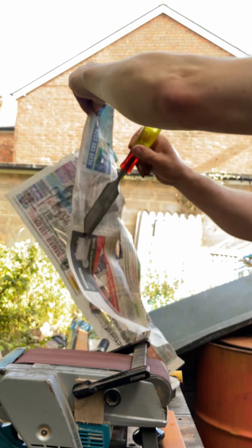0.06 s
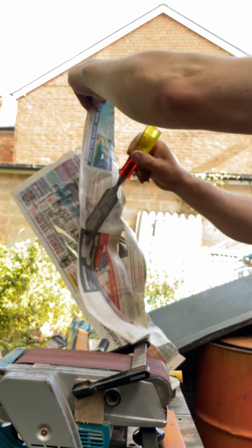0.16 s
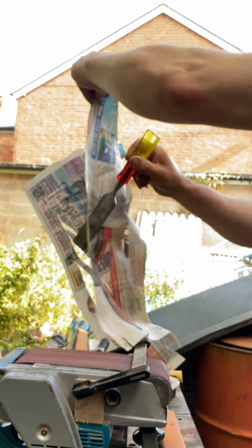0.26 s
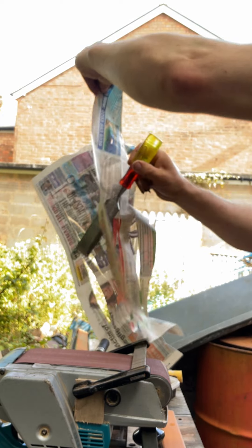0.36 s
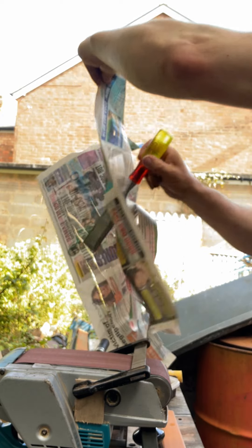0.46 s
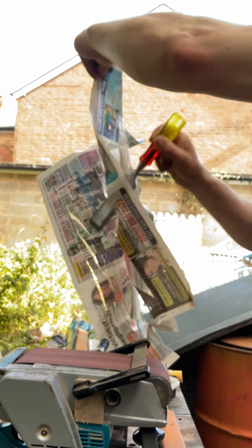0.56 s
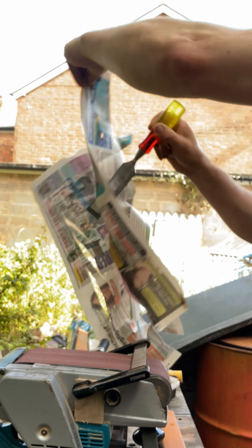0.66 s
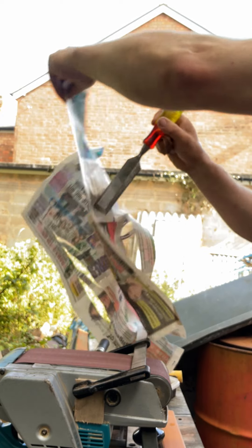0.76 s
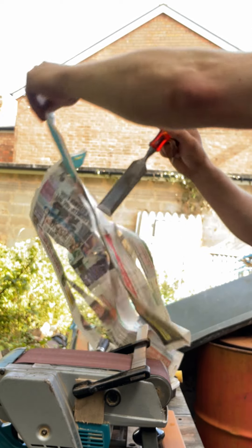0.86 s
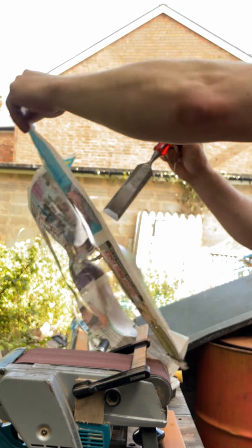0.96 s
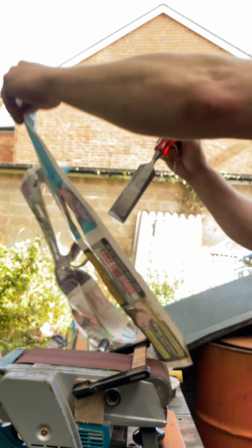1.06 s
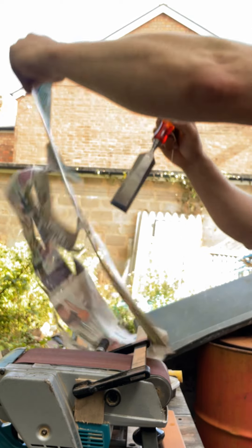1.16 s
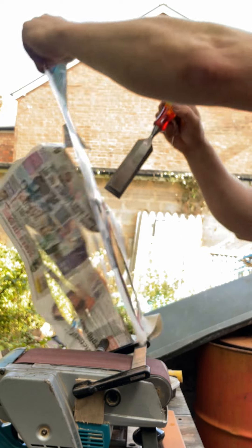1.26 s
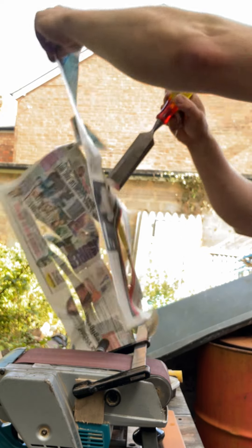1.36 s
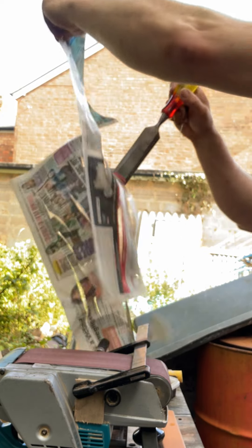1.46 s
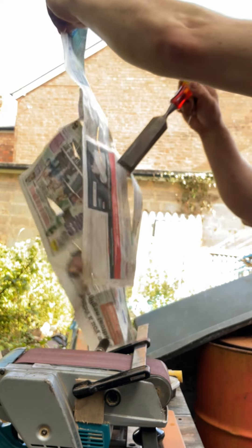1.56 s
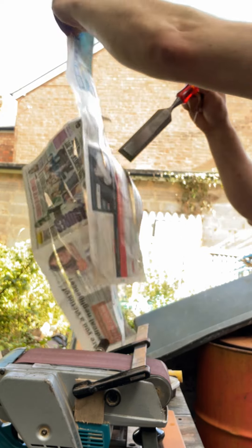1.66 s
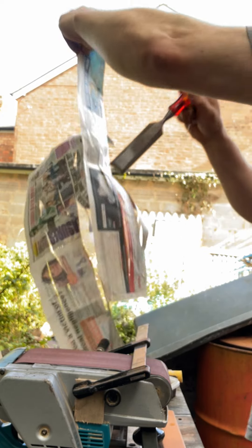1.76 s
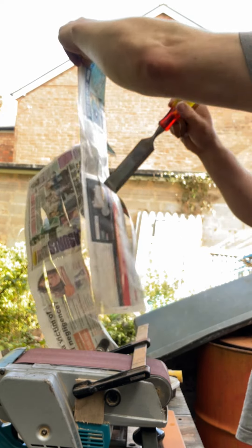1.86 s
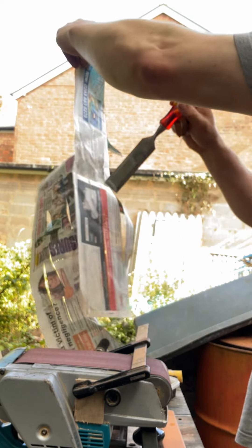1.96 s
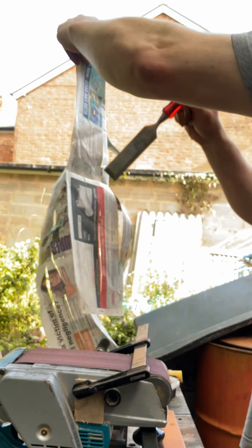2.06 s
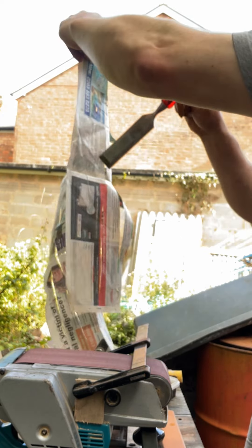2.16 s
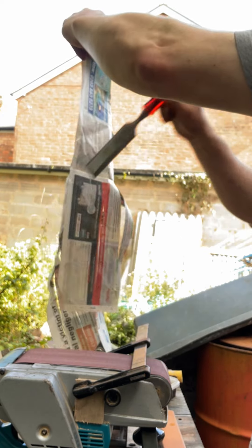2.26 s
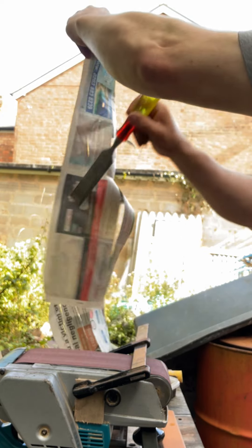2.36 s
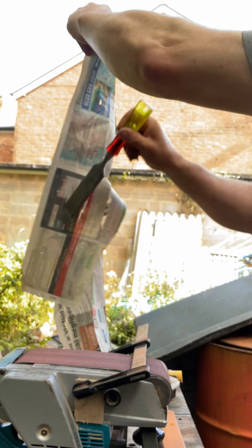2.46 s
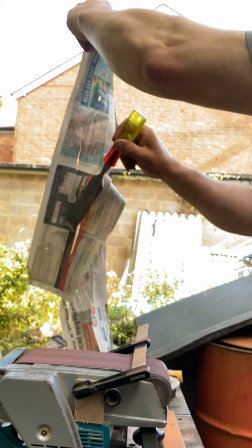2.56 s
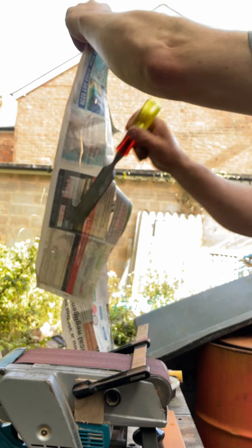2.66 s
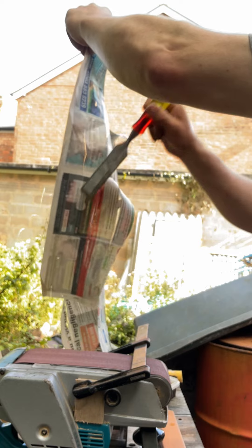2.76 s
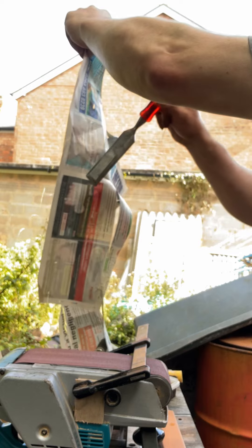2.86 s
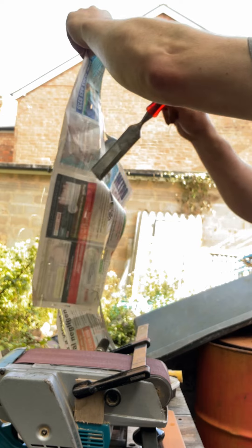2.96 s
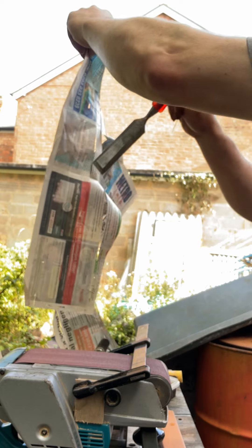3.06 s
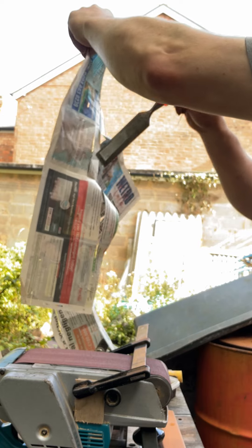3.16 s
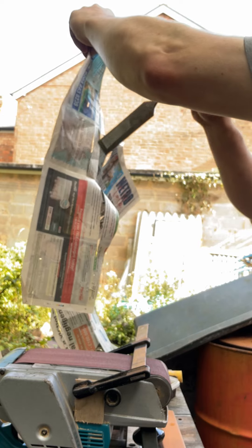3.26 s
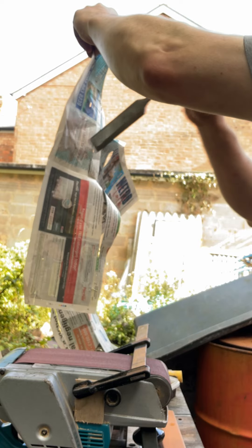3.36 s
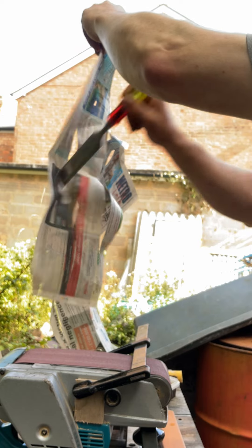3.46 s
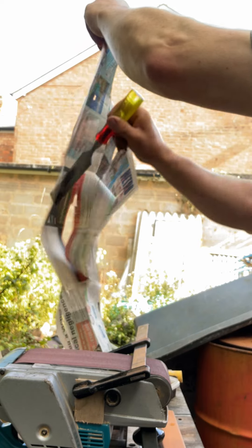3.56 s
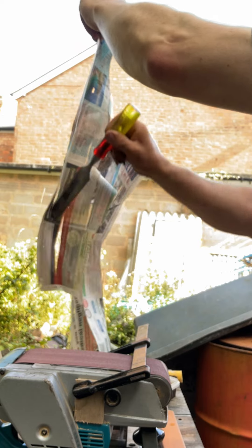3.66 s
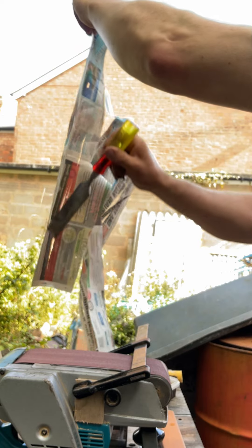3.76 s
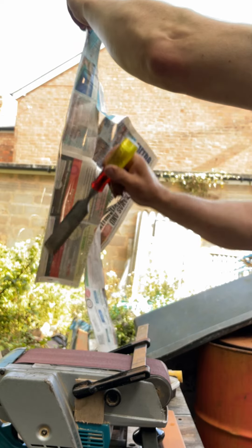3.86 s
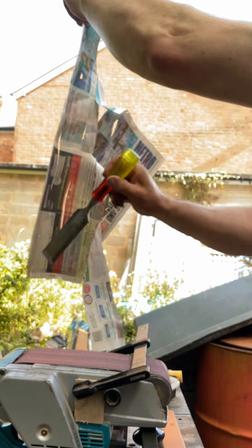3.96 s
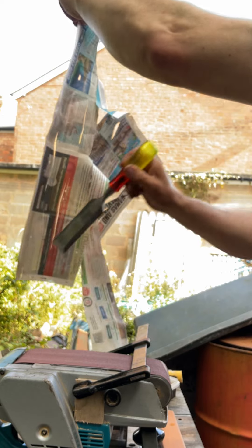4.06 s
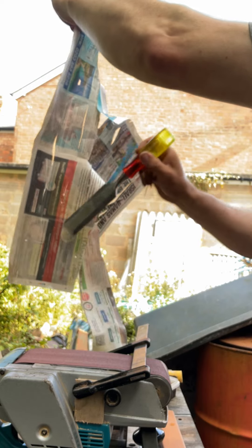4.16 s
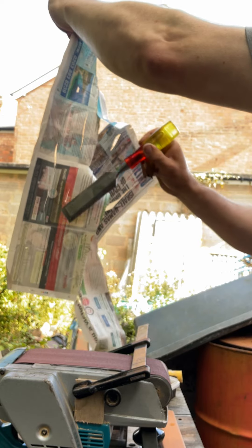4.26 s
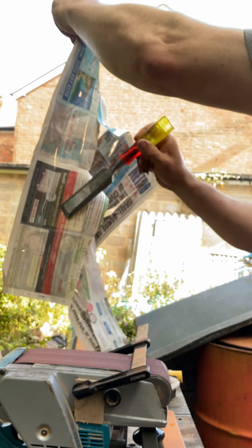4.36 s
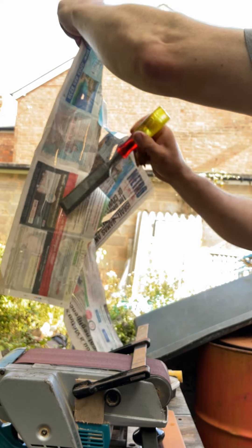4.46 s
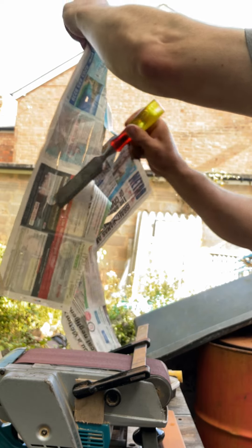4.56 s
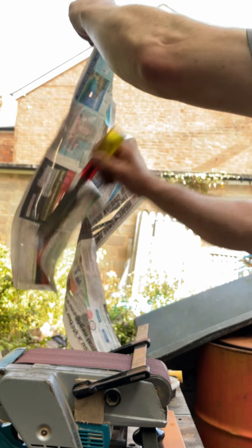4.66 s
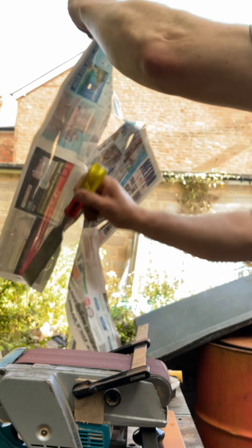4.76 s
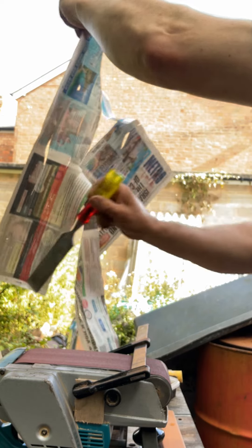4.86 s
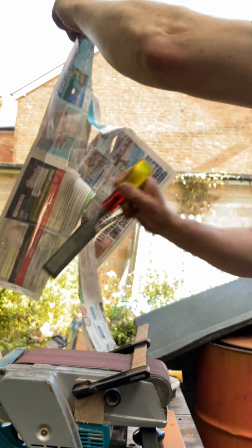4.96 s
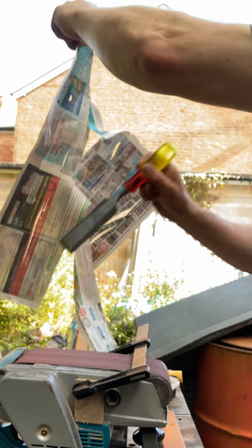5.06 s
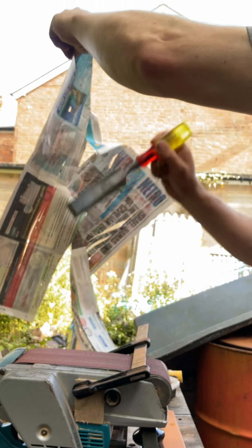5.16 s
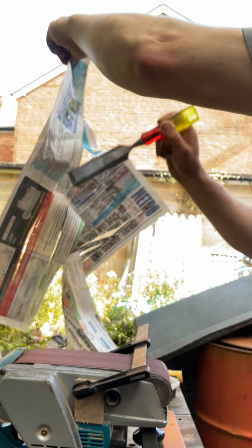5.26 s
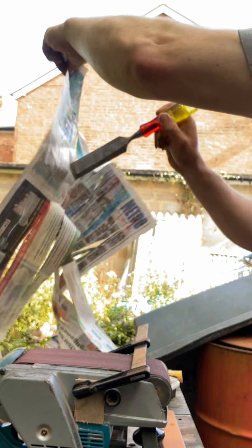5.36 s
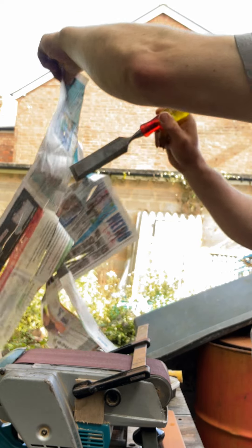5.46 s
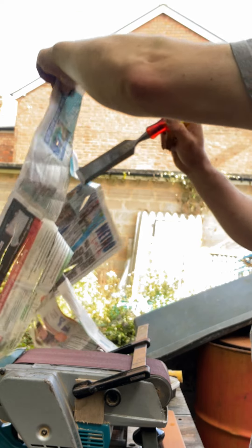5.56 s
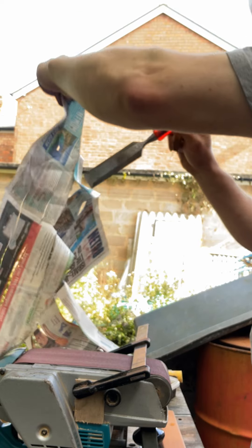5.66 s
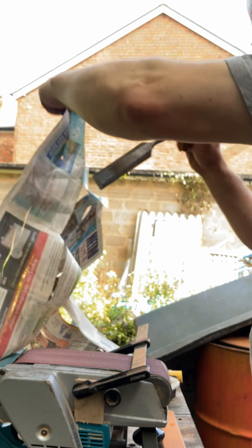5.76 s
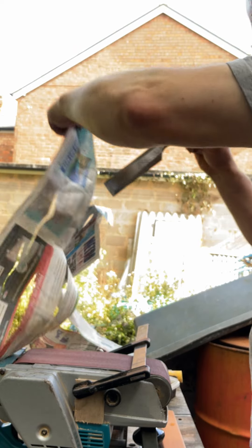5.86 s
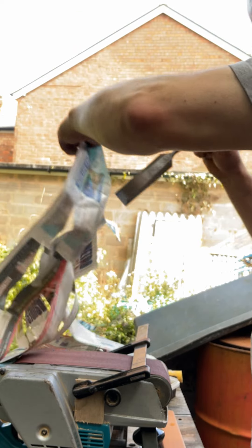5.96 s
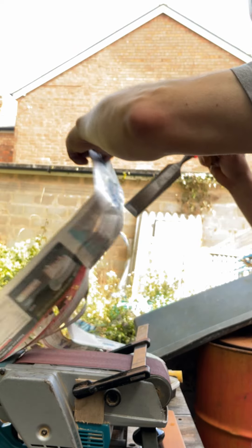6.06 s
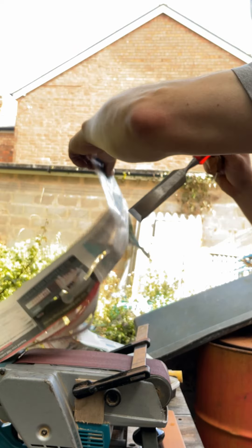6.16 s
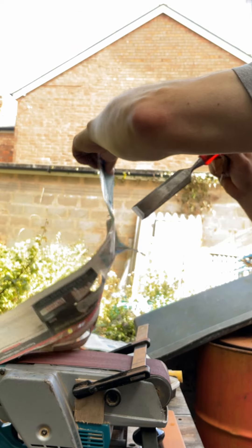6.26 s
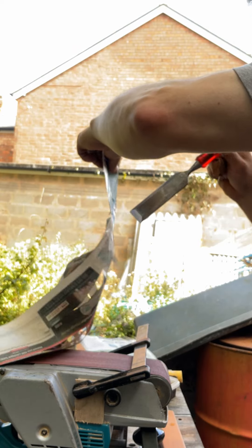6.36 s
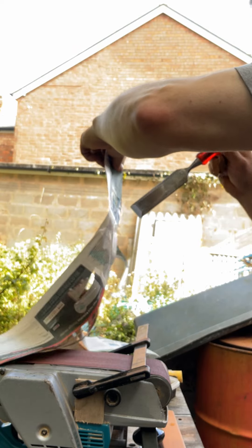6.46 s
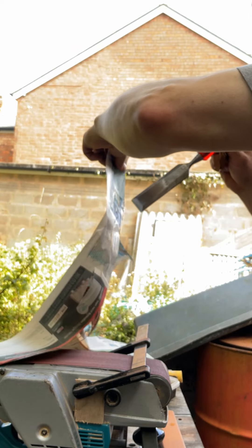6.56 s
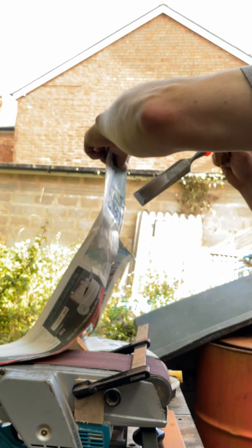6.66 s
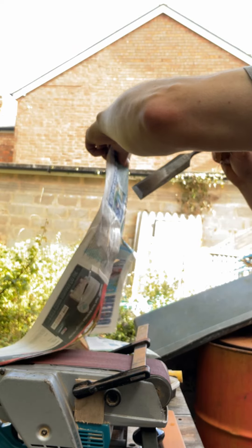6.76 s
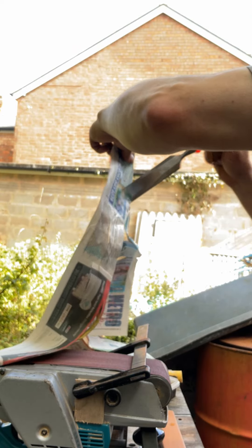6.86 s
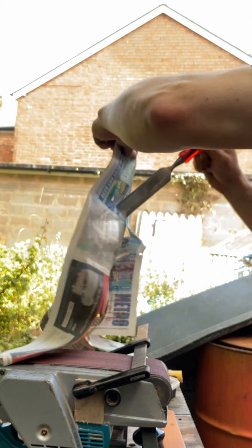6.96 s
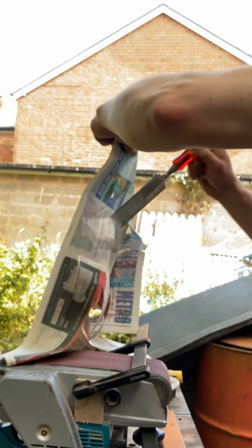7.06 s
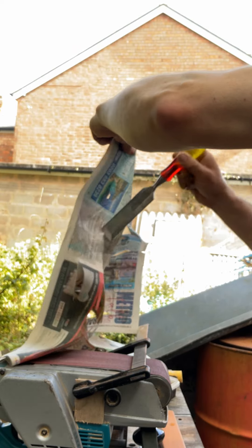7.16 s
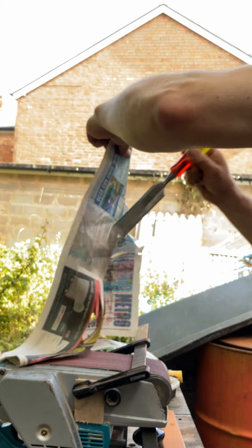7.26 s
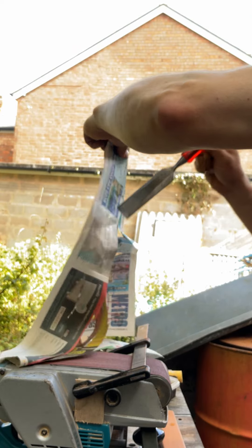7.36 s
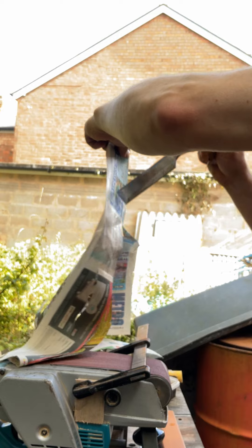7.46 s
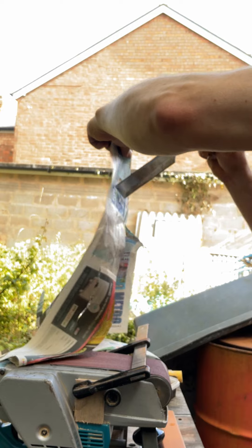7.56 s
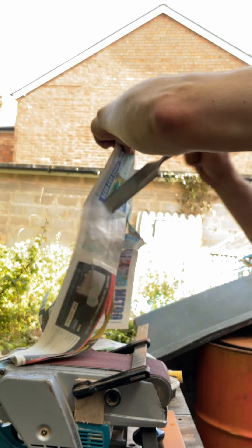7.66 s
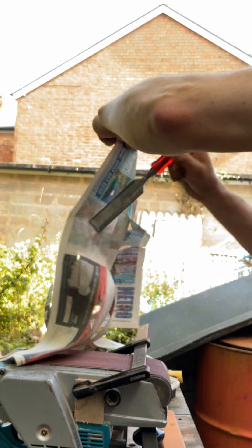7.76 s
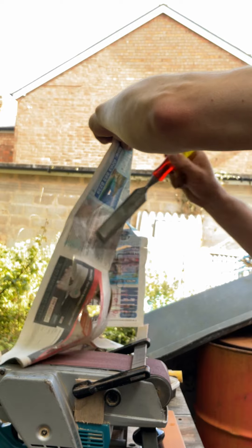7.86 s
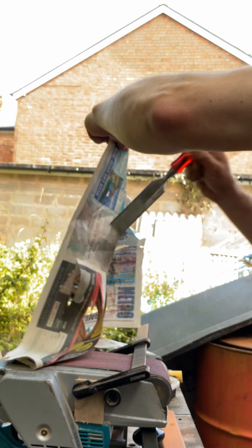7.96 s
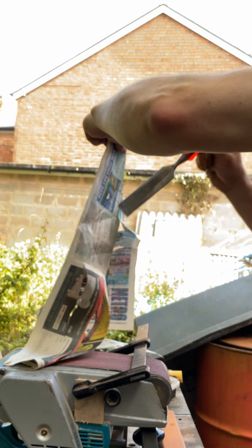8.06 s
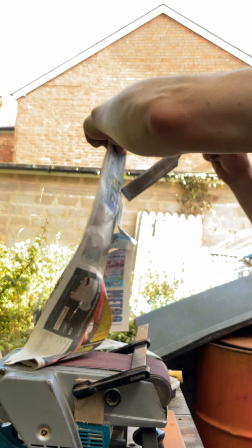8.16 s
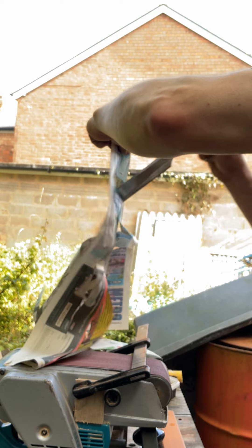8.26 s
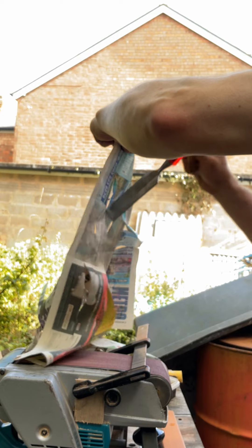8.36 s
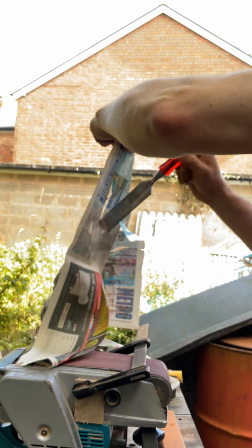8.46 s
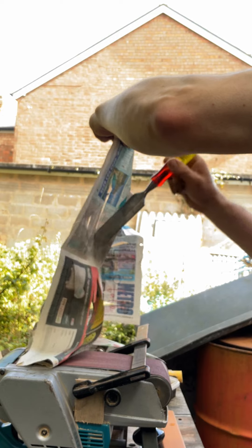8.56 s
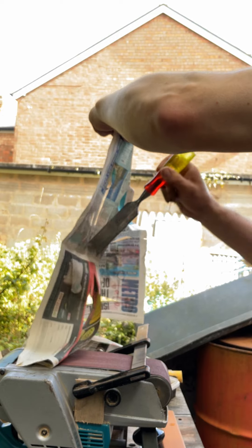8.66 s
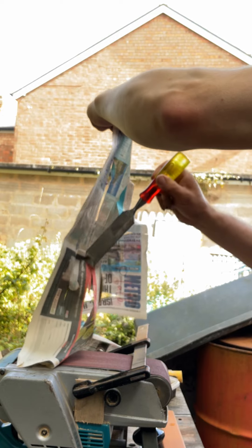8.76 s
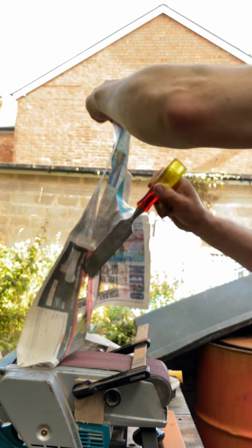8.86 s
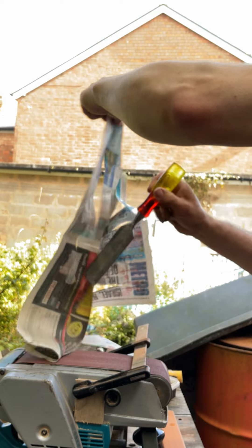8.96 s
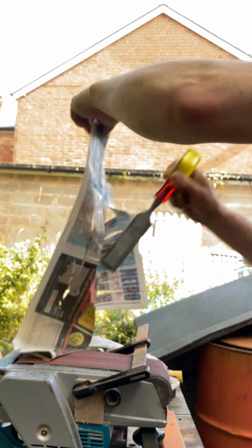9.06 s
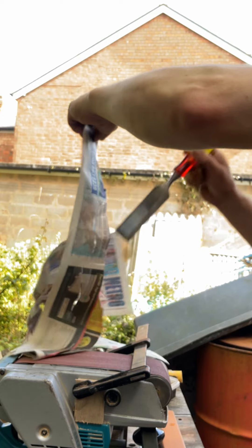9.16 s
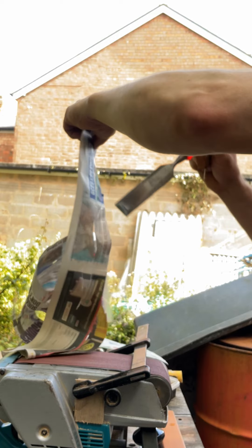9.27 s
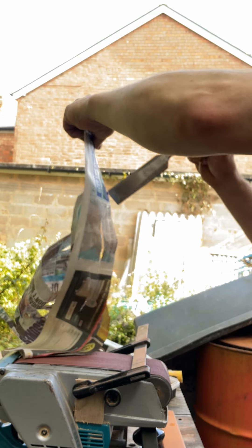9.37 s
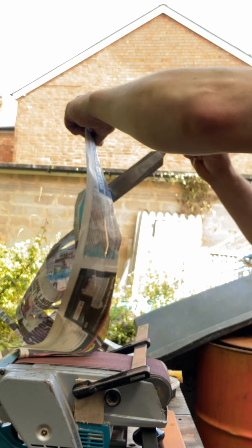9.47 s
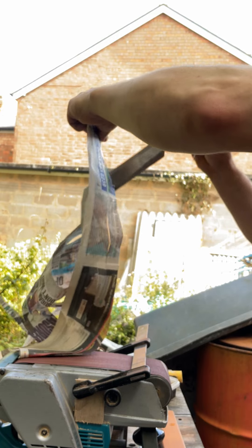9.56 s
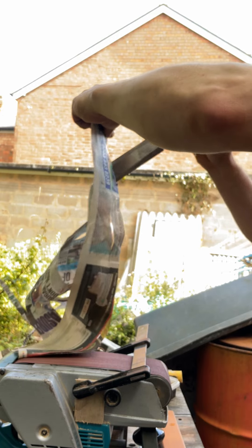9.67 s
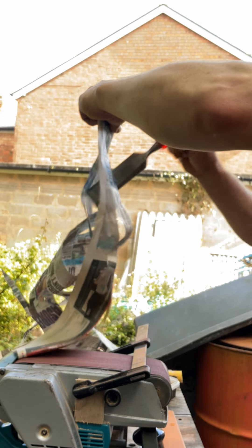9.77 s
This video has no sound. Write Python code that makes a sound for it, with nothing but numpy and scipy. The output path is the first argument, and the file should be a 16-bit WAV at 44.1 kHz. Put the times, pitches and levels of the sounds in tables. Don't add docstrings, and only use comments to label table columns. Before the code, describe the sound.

Close, dry newspaper tears and crackles in bursts as a chisel cuts it in a walled yard, while a far small engine revs midway.

```python
import sys
import numpy as np
from scipy import signal
from scipy.fft import rfft, irfft, next_fast_len
from scipy.io import wavfile
from scipy.ndimage import uniform_filter1d, map_coordinates

SR = 44100
rng = np.random.default_rng(int(sys.argv[2]) if len(sys.argv) > 2 else 0)


def voltage_ratio(level):
    return 10 ** (np.asarray(level, float) / 20)


def materialize(psi):
    bounded = np.clip(np.atleast_2d(psi).T, -1, 1)
    quanta = np.round(bounded * 32767).astype(np.int16)
    wavfile.write(sys.argv[1], SR, quanta)


N = 432180


def unit(x):
    return x / np.sqrt(np.mean(x ** 2) + 1e-20)


def along(points, hz):
    f, v = np.transpose(points)
    return np.interp(np.log(hz + 1), np.log(f + 1), v)


def curves(rows):
    s, *cols = np.transpose(rows)
    t = np.arange(N) / SR
    return [np.interp(t, s, col) for col in cols]


def sounding(rows, fade_s):
    t = np.arange(N) / SR
    to_edge = np.minimum(t - rows[0][0], rows[-1][0] - t)
    return np.clip(to_edge / fade_s, 0, 1)


def wobble(rate_hz):
    coarse = np.arange(0, N + 16, 16)
    knots = rng.standard_normal(int(N * rate_hz / SR) + 4)
    curve = map_coordinates(knots, [coarse * rate_hz / SR])
    return np.interp(np.arange(N), coarse, curve)


def coloured(x, spectrum):
    m = next_fast_len(N + 8192)
    spectrum = [(spectrum[0][0] / 2, -120), *spectrum]
    gain = voltage_ratio(along(spectrum, np.fft.rfftfreq(m, 1 / SR)))
    return unit(irfft(rfft(x, m) * gain, m)[:N])


def patchy(patchy_db, tall_bins=4, long_frames=12):
    z = signal.stft(rng.standard_normal(N), nperseg=256)[2]
    field = uniform_filter1d(rng.standard_normal(z.shape), tall_bins, 0)
    field = uniform_filter1d(field, long_frames, 1)
    return signal.istft(z * voltage_ratio(patchy_db * unit(field)), nperseg=256)[1][:N]


def town():
    # time in seconds, rumble level in dB.
    traffic = [(0, -60), (.44, -69), (.6, -59), (1.01, -65.5), (1.83, -62), (2.07, -69.5), (3.19, -67.5),
               (3.41, -62), (3.55, -65.5), (4.26, -67.5), (4.66, -73), (4.94, -67), (5.65, -66),
               (6.8, -70.5), (7.3, -66.5), (9.8, -66)]
    # time in seconds, level in dB.
    wash_drift = [(0, -54.5), (2, -61.5), (2.51, -55.5), (3.19, -66), (4.26, -61.5), (4.8, -57),
                  (5.65, -59), (6.63, -61), (7.1, -56.5), (9.8, -54.5)]
    # frequency in Hz, density in dB per Hz.
    road_spectrum = [(15, -55), (25, -51), (39, 2), (59, 6.5), (88, 8), (135, -5), (170, -8.5), (220, -41),
                     (370, -120)]
    # frequency in Hz, density in dB per Hz.
    yard_spectrum = [(82, -31), (140, -10), (196, -7), (321, -6), (422, -6.5), (475, -8.5), (515, -8.5),
                     (859, -11.5), (1650, -15), (1750, -16.5), (7820, -19), (15600, -20)]
    road_db, = curves(traffic)
    road = voltage_ratio(road_db + 1.4 * wobble(6.2)) * coloured(rng.standard_normal(N), road_spectrum)
    low = [(hz, db - 12 * max(0, np.log2(hz / 900))) for hz, db in yard_spectrum]
    wash_db, = curves(wash_drift)
    wash = voltage_ratio(wash_db - 8 + 0.45 * wobble(5.5)) * coloured(patchy(patchy_db=3.5), low)
    air = voltage_ratio(-71.5) * coloured(rng.standard_normal(N), yard_spectrum)
    return road + wash + air


def car():
    # time in seconds, firing rate in Hz, level in dB.
    gears = [
        [(4.9, 44.6, -101), (5.47, 54.6, -60.5), (5.658, 57.5, -54), (5.722, 56.4, -65), (6.1, 57, -50)],
        [(6.6, 60.5, -85), (6.68, 65.7, -65), (7.842, 96.4, -71), (8.114, 88, -75), (8.4, 95, -73)],
    ]
    # time in seconds, firing rate in Hz, level in dB.
    drones = [
        [(1.45, 73.6, -71), (1.474, 73.3, -62), (2.05, 74.8, -65)],
        [(2.65, 85.5, -76), (2.734, 90.4, -67), (3.2, 104, -69)],
        [(3.3, 58.5, -79), (3.38, 58.6, -49), (3.46, 58.5, -65)],
        [(4.15, 76.0, -71), (4.342, 76.0, -59), (4.45, 76.0, -75)],
        [(4.75, 88.3, -76), (4.884, 89.7, -67), (5.35, 104, -69)],
        [(9.3, 90.7, -70), (9.548, 95.2, -67), (9.8, 89.6, -61)],
    ]
    out = np.zeros(N)
    for rows, fade_s in [(gear, 0.29) for gear in gears] + [(drone, 0.06) for drone in drones]:
        hz, db = curves(rows)
        phase = 2 * np.pi * np.cumsum(hz * (1 + 0.013 * wobble(7.4))) / SR
        tone = np.sin(phase) + voltage_ratio(-19) * np.sin(2 * phase)
        out += sounding(rows, fade_s) * voltage_ratio(db + 0.5 + 4.1 * wobble(6.9)) * tone
    return out


def small_engine():
    # time in seconds, second order in Hz, levels of orders 2, 3 and 4 in dB.
    coast = [
        (3.79, 305, -66, -71, -90),
        (3.95, 297, -73, -74, -95),
        (4.1, 282, -66, -72, -95),
        (4.18, 270, -69, -94, -70),
        (4.35, 254, -68, -94, -77),
    ]
    # time in seconds, exhaust resonance in Hz, level in dB, roughness [0-1].
    revs = [
        [(4.28, 396, -69, 0.2), (4.372, 370, -62.5, 0.7), (4.486, 390, -56, 0.66), (4.502, 444, -64, 0.7),
         (4.57, 373, -66, 0.4)],
        [(4.72, 375.3, -41, 0.3), (4.74, 426, -56, 0.3), (4.956, 436, -56, 0.4), (5.09, 404.8, -59, 0.6),
         (5.134, 451, -55.5, 0.55), (5.252, 424, -59.5, 0.6), (5.274, 381, -56, 0.73), (5.5, 334, -68, 0.05)],
    ]
    hz, *order_db = curves(coast)
    phase = np.pi * np.cumsum(hz) / SR
    orders = sum(voltage_ratio(db + wobble(5.3)) * np.sin(order * phase) for order, db in enumerate(order_db, 2))
    out = sounding(coast, fade_s=0.018) * orders
    for rev in revs:
        hz, db, rough = curves(rev)
        rough = np.clip(rough, 0, 1)
        phase = 2 * np.pi * np.cumsum(hz * (1 + 0.0171 * wobble(30))) / SR
        tone = voltage_ratio(2.5 + 3.9 * wobble(25)) * np.sin(phase)
        torn = wobble(230) * np.sin(1.04 * phase) + wobble(230) * np.cos(0.96 * phase)
        mixed = np.sqrt(1 - rough) * tone + np.sqrt(rough) * torn
        out += sounding(rev, fade_s=0.015) * voltage_ratio(db) * mixed
    return out


def walls(x):
    # frequency in Hz, t60 in seconds.
    decay = [
        (200, 0.31),
        (2000, 0.087),
        (10000, 0.56),
    ]
    hz, t, z = signal.stft(rng.standard_normal(SR // 3), SR, nperseg=256)
    fall = voltage_ratio(-60 * t / along(decay, hz)[:, None])
    tail = signal.istft(z * fall, SR, nperseg=256)[1]
    late = np.pad(x, (250, 0))
    return signal.fftconvolve(late, tail / np.linalg.norm(tail))[:N]


def bench_top(x):
    delay_s, echo_db = 0.001219, -21
    return x + voltage_ratio(echo_db) * np.pad(x, (round(delay_s * SR), 0))[:N]


def knock():
    # start in seconds, peak in dB, tilt in dB per octave above 450 Hz.
    blows = [
        (.5877, -15.5, -3.5),
        (.5921, -20, -9),
        (4.5945, -43, -9),
    ]
    # frequency in Hz, level in dB, t60 in seconds.
    modes = [(114, -11, 0.12), (235, -3, 0.016), (338, -7, 0.086), (538, 3.5, 0.014), (804, 5.5, 0.028),
             (907, -5.5, 0.073), (985, 6.5, 0.034), (1300, 8, 0.0077), (1880, 3, 0.0053), (2400, 7, 0.014),
             (3080, 6, 0.0051), (630, -18, .13), (740, -10, 0.039), (1420, -15, .05)]
    out, t = np.zeros(N + SR), np.arange(SR // 5) / SR
    for s, db, tilt_db in blows:
        ring = np.zeros(len(t))
        for k, (hz, level_db, t60_s) in enumerate(modes):
            octaves = np.clip(np.log2(hz / 450), 0, 2)
            decay = voltage_ratio(level_db + tilt_db * octaves - 60 * t / t60_s)
            ring += (-1) ** k * decay * np.sin(2 * np.pi * hz * t)
        out[round(s * SR):][:len(t)] += voltage_ratio(db) * ring / np.abs(ring).max()
    return out[:N]


def chatter():
    # time in seconds, resonance in Hz, level in dB.
    strips = [
        [(0, 1360, -44.5), (.13, 1243, -47), (.26, 1347, -46.5), (.29, 1300, -86)],
        [(8.77, 2400, -66), (8.79, 2400, -35.5), (8.81, 2400, -71), (8.86, 2280, -54), (8.9, 2300, -34.5),
         (8.94, 2160, -68)],
        [(2.7, 1596, -64), (2.725, 1600, -69)],
        [(9.605, 3020, -70), (9.635, 2620, -71)],
        [(9.7, 950, -72), (9.8, 953, -47)],
        [(5.54, 4170, -69), (5.63, 4070, -72)],
    ]
    # start in seconds, length in seconds, first and last Hz, level in dB.
    sings = [(2.527, 0.026, 3500, 3050, -57.5), (2, .045, 3100, 2900, -74), (2.4, .03, 1450, 1450, -65),
             (2.36, 0.061, 3700, 4900, -48), (8.34, .12, 1000, 550, -53), (8.36, .04, 2000, 1800, -44),
             (8.62, 0.034, 2400, 2100, -48), (8.66, 0.053, 1000, 1600, -46), (8.83, .08, 1100, 950, -47.5),
             (5.9, .085, 6000, 5900, -64), (5.1, .09, 4100, 4300, -61), (5.8, 0.065, 3200, 1700, -58),
             (5.105, 0.037, 5900, 4900, -60), (1.2, 0.092, 2800, 2200, -49.5),
             (1.44, .05, 1300, 1500, -48.5), (1.51, .025, 2100, 2000, -46), (.44, 0.108, 1500, 1550, -51),
             (0.69, .03, 1000, 1000, -56), (4.6, .06, 1900, 2200, -60), (8.55, 0.072, 510, 550, -52),
             (4.635, 0.037, 1100, 1000, -54), (3.55, 0.15, 1000, 1050, -49), (7.6, .055, 4100, 4600, -48),
             (6.9, 0.066, 3050, 3000, -52), (7.11, .1, 2600, 3000, -54), (.05, 0.133, 2300, 2300, -51),
             (9.9, .12, 1100, 1200, -59), (9.27, 0.123, 4000, 3950, -63), (9.46, 0.077, 3500, 3100, -71.5),
             (7.645, 0.058, 2700, 2900, -53), (9.755, 0.041, 2000, 2400, -52.5),
             (7.76, .1, 1600, 1900, -49.5), (5.29, .12, 980, 1300, -69)]
    patches = [[(s, first_hz, db), (s + length_s, last_hz, db)] for s, length_s, first_hz, last_hz, db in sings]
    grain = voltage_ratio(4 * wobble(170))

    def band(rate_hz):
        return unit(grain * wobble(rate_hz)) + 1j * unit(grain * wobble(rate_hz))

    narrow, wide = band(620), band(950)
    out = np.zeros(N)
    for k, rows in enumerate(strips + patches):
        on = sounding(rows, fade_s=0.01)
        span = on > 0
        t = np.flatnonzero(span) / SR
        s, hz, db = np.transpose(rows)
        hz, db = np.interp(t, s, hz), np.interp(t, s, db)
        source = narrow if rows[0][1] < 1800 else wide
        rough = np.roll(source, k * SR // 5)[span]
        carrier = np.exp(2j * np.pi * np.cumsum(hz) / SR)
        out[span] += on[span] * voltage_ratio(db) * (rough * carrier).real
    return out


def snaps():
    # start in seconds, peak in dB, panel in Hz, crackle in dB over the peak.
    sharp = [(0.3007, -36.5, 2830, -7), (0.4125, -31.5, 2940, -7), (0.4446, -32, 1840, -8),
             (0.831, -45, 1410, 5), (0.9401, -47, 1260, -16), (1.1107, -39.5, 2620, -26),
             (1.1666, -48.5, 1090, 4), (1.2449, -34.5, 4250, 1), (1.3636, -32.5, 2270, -9),
             (2.3275, -47, 2400, 2), (3.4666, -43, 1110, 4.5), (3.4793, -30, 4130, -18),
             (1.803, -47, 700, -24), (4.622, -44, 2810, -15), (2.535, -49, 3200, -16),
             (4.723, -26, 2340, -23), (5.0952, -39, 5240, -16), (5.8992, -36, 1390, -14),
             (1.1835, -44, 1100, -2), (1.292, -46, 1100, 6), (6.908, -43, 2830, -13),
             (6.964, -38, 1200, -21), (7.1071, -55, 3170, 7), (8.2982, -37, 1580, -13),
             (8.7828, -38, 2370, 4), (1.203, -45, 1500, 0), (9.168, -45, 2500, 2), (9.1539, -49, 1260, -2),
             (9.222, -50, 1700, -14), (9.7336, -42, 3650, 1)]
    # start in seconds, peak in
    # dB, panel in Hz, crackle in dB over the peak.
    cracks = [
        (3.5374, -19.5, 4200, -1),
        (3.5605, -28, 2300, -14),
        (.5873, -19.5, 2300, -32),
        (8.9514, -25, 1900, -7),
        (5.2191, -39, 1200, -4),
        (6.0622, -37, 1750, -4),
        (6.9585, -31, 1700, -18),
        (9.2861, -40, 2000, -3),
        (9.0896, -42, 2300, -2),
    ]
    # start in seconds, peak in dB, panel in Hz, crackle in dB over the peak.
    ticks = [(0.7525, -50, 1020, -12), (1.0349, -46, 1070, -20), (1.7637, -48, 900, -14),
             (1.8311, -47, 1550, -10), (5.0602, -50, 1100, -3), (1.051, -50, 2000, -26),
             (5.2275, -43, 3900, -20), (7.6399, -41, 2000, -20), (2.5086, -43.5, 2180, -20),
             (2.6193, -54, 1650, -13), (2.7899, -54, 2510, -11), (3.8909, -49, 3210, -20),
             (4.5394, -52.5, 1050, -8), (4.5918, -50, 1100, -12), (5.0365, -46, 2100, -14),
             (6.2562, -53, 2150, -8), (5.3393, -45, 4200, -16), (5.4935, -47, 1790, -20),
             (5.5199, -59, 3500, -12), (5.6681, -38, 1780, -17), (5.7484, -53, 2020, -8),
             (5.7723, -40, 1296, -18), (5.7983, -37.5, 1610, -3), (5.8606, -45, 2700, 0),
             (6.0323, -38, 1570, -10), (6.3326, -45, 2170, -20), (6.4114, -49, 1800, -20),
             (6.8691, -48, 1310, -24), (7.3455, -42, 1800, -26), (7.6234, -44, 1390, -20),
             (5.0265, -52, 1450, -20), (5.1035, -49, 4500, -10), (5.2929, -57, 1100, -6),
             (5.3618, -51, 1350, -1), (5.486, -51, 900, -20), (5.535, -50, 900, -20),
             (5.5518, -51, 4030, -14), (5.891, -42, 1102, -14), (6.0941, -42, 1540, -4),
             (6.103, -44, 1200, -14), (6.2672, -50, 3160, -6), (6.181, -46, 1300, -14),
             (5.966, -54, 950, -20), (6.4398, -54, 1200, -20), (5.204, -49, 1300, -9),
             (8.872, -31, 1010, 3), (8.892, -34, 1090, -6), (8.927, -46, 2300, -10),
             (8.705, -37, 1530, -14), (8.996, -43, 2500, -14)]
    creaks_s = [2.0758, 2.1274, 2.1962, 2.2411, 2.2694]
    creaks = [(s, -51.5, 980, -30) for s in creaks_s]
    bright_top_hz, dull_top_hz = 13000, 6500
    creases = [(*row, bright_top_hz) for row in sharp + cracks[:2]]
    creases += [(*row, dull_top_hz) for row in ticks + cracks[2:] + creaks]
    out, t = np.zeros(N + SR), np.arange(SR // 20) / SR
    shiver = voltage_ratio(-60 * t / 0.007) + voltage_ratio(-15 - 60 * t / 0.04)
    kick = 3.5 * (t == 0)

    def burst(order, low_hz, high_hz):
        sos = signal.butter(order, [low_hz, high_hz], "band", fs=SR, output="sos")
        y = signal.sosfilt(sos, kick + rng.standard_normal(len(t)) * shiver)
        return y / np.abs(y).max()

    for s, db, hz, crackle_db, top_hz in creases:
        panel = burst(2, 0.71 * hz, 1.27 * hz)
        crackle = burst(3, min(1.4 * hz, 2500), top_hz)
        out[round(s * SR):][:len(t)] += voltage_ratio(db) * (panel + voltage_ratio(crackle_db + 4) * crackle)
    return out[:N]


def panels(low_hz, high_hz, rate_hz, sharp_q, count):
    out = np.zeros(N)
    for hz in np.geomspace(low_hz, high_hz, count):
        hits = rng.random(N) < rate_hz / SR
        ticks = hits * rng.standard_normal(N) * voltage_ratio(2.5 * wobble(14))
        out += unit(signal.lfilter(*signal.iirpeak(hz, sharp_q, SR), ticks)) * np.sqrt(hz)
    return unit(out)


def pushes(rows, fall_db_per_s, bend, still_db):
    t = np.arange(0, N + 32, 32) / SR
    s, rise, hold, db, haste = np.transpose(rows)[:, :, None]
    swell = np.clip(1 + (t - s) / rise, 0, 1) ** bend
    after = haste * np.clip(t - s - hold, 0, 1)
    fall_db = fall_db_per_s * after * (1.5 + 1.4 * after)
    power = np.sum((swell * voltage_ratio(db - fall_db)) ** 2, axis=0) + voltage_ratio(still_db) ** 2
    return np.interp(np.arange(N) / SR, t, 10 * np.log10(power))


def slicing():
    # full at seconds, rise and hold in seconds, fibre hiss in dB, sheet rattle in dB.
    strokes = [(0, .01, 0.24, -41.5, -43), (0.458, 0.089, 0.12, -39, -43.5),
               (0.67, 0.24, 0.034, -53.5, -53.5), (1.168, 0.031, 0.043, -47.5, -50),
               (1.247, 0.008, 0.01, -39.5, -47.5), (1.407, 0.1, 0.065, -36, -41),
               (1.565, 0.044, 0.013, -65, -54.5), (2.325, 0.0044, 0.0053, -47, -46.5),
               (2.425, 0.011, .005, -64, -64), (1.48, 0.028, 0.011, -40, -49),
               (2.374, 0.053, 0.0056, -40, -40.5), (3.494, 0.028, 0.023, -31.5, -36.5),
               (3.554, 0.045, 0.13, -39, -44), (3.696, 0.093, 0.11, -44.5, -53),
               (4.659, 0.03, 0.003, -34.5, -37), (4.634, 0.026, .005, -56, -47.5),
               (4.71, 0.015, 0.0016, -32.5, -40.5), (6.945, 0.05, 0.068, -41.5, -44),
               (7.161, 0.078, 0.026, -38.5, -41.5), (7.117, .02, .01, -47, -47),
               (7.05, 0.016, 0.0046, -52, -50.5), (7.752, 0.11, 0.013, -36.5, -41.5),
               (7.819, 0.061, 0.019, -44.5, -48.5), (7.658, 0.053, .01, -65, -56),
               (8.325, 0.045, 0.11, -40.5, -47), (8.5, 0.2, 0.11, -44, -57),
               (8.703, 0.23, 0.052, -41.5, -43), (8.8, 0.037, 0.0074, -31.5, -51),
               (8.861, 0.066, 0.076, -38, -40.5), (9.794, 0.088, .02, -42, -45)]
    # full at seconds, rise in seconds, fibre hiss in dB, sheet rattle in dB.
    rustles = [(.828, 0.068, -48, -50), (1.108, 0.018, -59.5, -56), (1.804, 0.025, -64, -62.5),
               (2.2, 0.19, -75, -83), (2.54, 0.068, -60.5, -60.5), (2.71, 0.054, -72, -68),
               (.35, 0.053, -54, -57.5), (3.918, 0.028, -73, -67), (4.358, 0.031, -69, -74),
               (4.994, 0.07, -67, -83), (5.12, 0.13, -72, -65.5), (5.226, 0.03, -81, -64.5),
               (5.33, 0.039, -57, -62), (5.458, 0.21, -61, -67), (5.578, 0.077, -60.5, -60),
               (5.68, 0.024, -64, -62.5), (5.778, 0.049, -57.5, -59), (5.87, 0.13, -75, -53.5),
               (5.97, 0.15, -54.5, -54.5), (6.066, 0.051, -48, -52), (6.185, 0.12, -57, -56.5),
               (6.12, 0.047, -49.5, -56), (6.267, 0.027, -52.5, -56.5), (6.35, 0.11, -67, -60.5),
               (6.582, 0.43, -75, -71.5), (9.08, 0.08, -56, -57), (9.156, 0.04, -48.5, -51.5),
               (9.25, 0.034, -57.5, -59.5), (9.35, 0.2, -56, -59), (9.496, 0.12, -64.5, -68),
               (9.618, 0.031, -76, -69)]
    # time in seconds, boom in dB over the rattle.
    slack = [(0, 1), (.23, -2), (.5, -10.5), (.7, -12), (1.4, -6), (2.2, -2.5), (2.39, -12.5), (3.0, -13),
             (3.5, -5.5), (3.9, -11.5), (4.65, -20.5), (5.4, -5), (6.2, -8), (7.6, -8.5), (8.45, -2),
             (8.9, -6.5), (9.55, -4.5), (9.8, -11)]
    # frequency in Hz, density in dB per Hz.
    fibre_spectrum = [(2060, -25), (3500, -6.5), (3940, -2.5), (4360, -7.5), (4730, -3), (7370, -4),
                      (11300, -4), (13600, -1), (15600, 1)]
    rattle_spectrum = [(470, -9.5), (800, -8.5), (1100, -1), (1740, -2), (2380, 0), (2820, -3), (3150, -1),
                       (3440, -10.5), (3920, -3), (4350, -6.5), (5500, -11), (7150, -13.5), (12100, -120)]
    boom_spectrum = [(71, -67), (120, -12.5), (339, -1), (387, -1), (549, -1.5), (661, -8), (820, -2.5),
                     (1400, -3), (1820, -23.5), (3080, -120)]
    slide_haste = 0.88
    sheet_lead = 1.2
    moves = [(*row, 1) for row in strokes]
    moves += [(s, rise, 0, hiss, rattle, slide_haste) for s, rise, hiss, rattle in rustles]
    blade = [(s, rise, hold, db, haste) for s, rise, hold, db, _, haste in moves]
    sheet = [(s, sheet_lead * rise, hold, db, haste) for s, rise, hold, _, db, haste in moves]
    hiss_db = pushes(blade, fall_db_per_s=116, bend=0.87, still_db=-78)
    rattle_db = pushes(sheet, fall_db_per_s=127, bend=1, still_db=-84)
    pivot_db = -39
    boom_db = pivot_db + 0.71 * (rattle_db - pivot_db) + curves(slack)[0]
    jerk_db = 1.1 * wobble(40) + 1.3 * wobble(250)
    hiss = voltage_ratio(jerk_db + 0.8 * wobble(900)) * patchy(patchy_db=1.8, tall_bins=7, long_frames=14)
    ringing = panels(830, 7000, rate_hz=220, sharp_q=14, count=14)
    shaking = unit(patchy(patchy_db=2.5, tall_bins=3, long_frames=12))
    rattle = voltage_ratio(1.2 * jerk_db) * (shaking + 0.55 * ringing)
    boom = voltage_ratio(0.77 * jerk_db + 1.1 * wobble(50)) * patchy(patchy_db=3, tall_bins=1, long_frames=12)
    out = voltage_ratio(hiss_db + 2) * coloured(hiss, fibre_spectrum)
    out += voltage_ratio(rattle_db - 1.24) * coloured(rattle, rattle_spectrum)
    return out + voltage_ratio(boom_db - 2.26) * coloured(boom, boom_spectrum)


def scene():
    behind = town() + car() + small_engine()
    clicks = snaps() + knock()
    paper = bench_top(slicing()) + chatter()
    return (behind + voltage_ratio(-6) * walls(clicks) + clicks + paper)[None]


def roll_off(x):
    return signal.sosfilt(signal.butter(12, 17060, fs=SR, output="sos"), x)


def record(dry):
    low_hz, high_hz = 38, 15800
    hz = np.fft.rfftfreq(N, 1 / SR)
    passed = (hz < high_hz) / (1 + (low_hz / (hz + 1)) ** 6)
    return roll_off(irfft(rfft(dry) * passed, N))


dry = scene()
out = record(dry)
materialize(out)
```